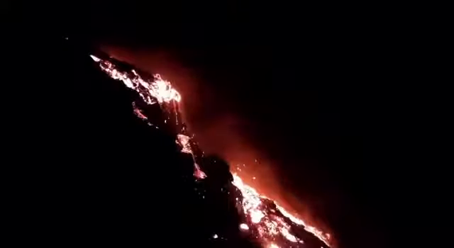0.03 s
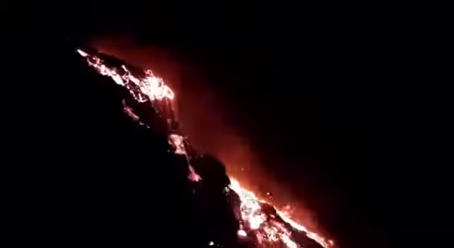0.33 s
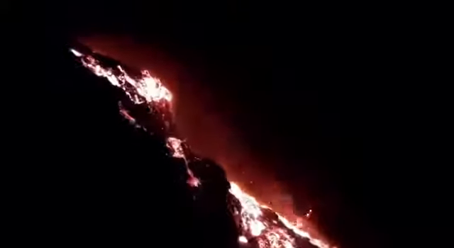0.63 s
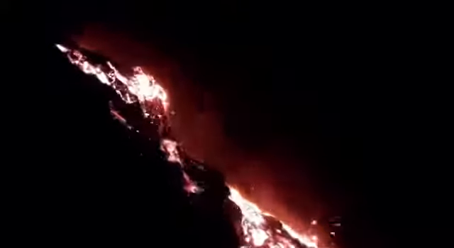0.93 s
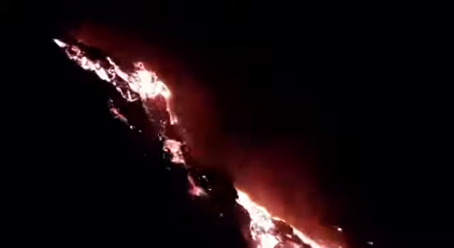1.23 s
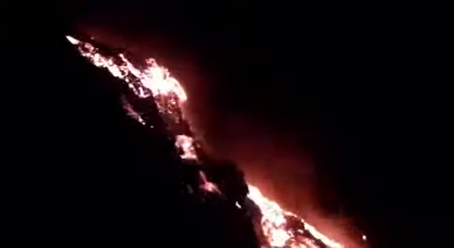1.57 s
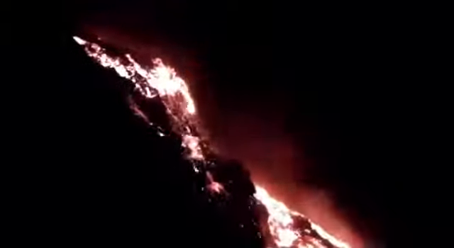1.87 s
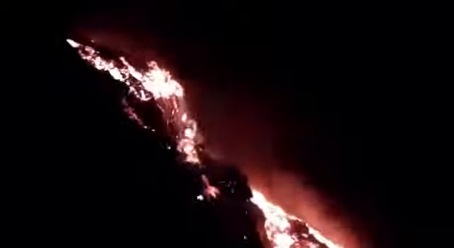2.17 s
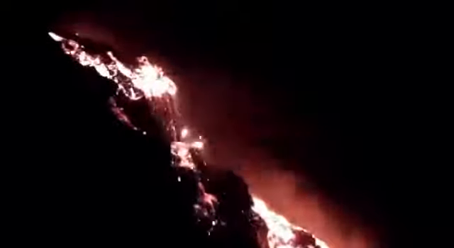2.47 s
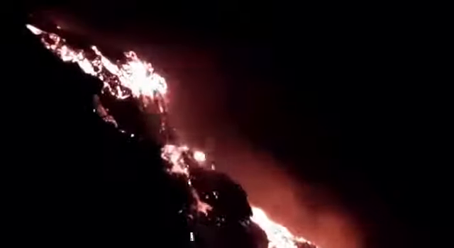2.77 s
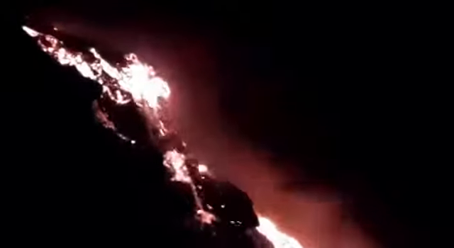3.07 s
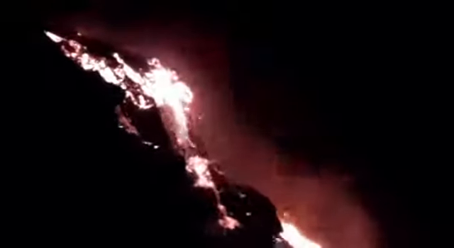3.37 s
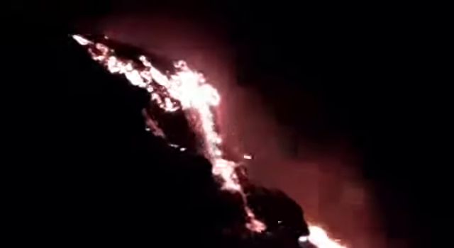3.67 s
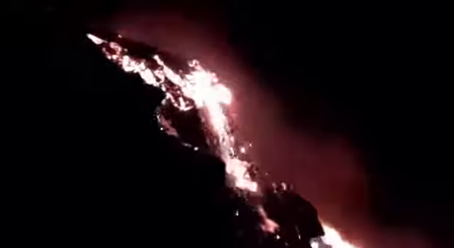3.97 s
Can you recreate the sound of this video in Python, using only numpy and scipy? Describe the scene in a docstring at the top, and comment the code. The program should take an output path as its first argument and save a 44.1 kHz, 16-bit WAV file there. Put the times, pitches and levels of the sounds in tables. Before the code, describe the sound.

A lava flow slides down a slope some way off with a steady rush, small crackles and the knocks and snaps of tumbling stones. Wind gusts rumble and pop on the microphone throughout, and two dry ticks sound close by.

```python
"""A lava flow at night, heard from some distance in gusty wind.
Loose clinker slides down the slope in a steady rush, full of small crackles, and larger fragments
knock, crack and snap as they tumble. Gusts rumble and flutter on the two microphone ports, each on
its own, and single eddies pop against them. Two dry ticks sound close by, over a faint electronic whine."""
import sys
import numpy as np
from scipy import signal
from scipy.fft import rfft, irfft
from scipy.io import wavfile
from scipy.ndimage import uniform_filter1d

SR = 44100
rng = np.random.default_rng(int(sys.argv[2]) if len(sys.argv) > 2 else 0)


def transcribe(signal):
    """Save signal, clipped to [-1, 1], as a 16-bit WAV file at the path in sys.argv[1]."""
    frames = np.atleast_2d(signal).T
    limited = np.clip(frames, -1, 1)
    pcm = np.round(limited * 32767).astype(np.int16)
    wavfile.write(sys.argv[1], SR, pcm)


N = 176400

# swell of the sliding clinker: time_s, body_db, hiss_db
SLIDE_LEVELS = [(0, -54, -51.5), (0.07, -53.5, -49), (0.19, -51, -51), (0.3, -54, -53), (0.52, -54, -51.5),
                (0.58, -60, -53.5), (0.72, -56, -50), (0.95, -52, -52.5), (1.13, -57.5, -53.5),
                (1.3, -53.5, -52.0), (1.44, -47.5, -50), (1.58, -56, -52.5), (1.72, -54, -50.5),
                (1.9, -55, -54), (2.05, -60, -53), (2.1, -53.5, -54), (2.16, -47, -49.5), (2.24, -54, -53),
                (2.45, -54.5, -55), (2.55, -53, -51.5), (2.9, -55.5, -53), (3.2, -52, -51.0),
                (3.36, -59, -56), (3.46, -58.5, -52.5), (3.58, -52, -51.5), (3.82, -49.5, -51),
                (4, -57, -53)]
# colour of its body: freq_hz, gain_db
BODY_COLOUR = [(40, -5.5), (120, -2.5), (400, 2), (800, -1), (1400, -1), (1900, -1.5), (2300, -13),
               (2650, -27.5), (3500, -50), (6000, -34.5)]
# colour of its hiss: freq_hz, gain_db
HISS_COLOUR = [(1200, -11.5), (2200, -3.5), (2650, -5), (3050, -3), (3800, 0), (4800, -1.5), (6300, -6),
               (7100, -11), (7900, -22.5), (9500, -28.5)]
# how alike the rush is left and right: freq_hz, correlation
RUSH_CORRELATION = [(100, 0.34), (1100, 0.41), (1550, -0.0026), (1900, 0.21), (2600, -0.13), (3100, 0.38),
                    (3900, -0.15), (4600, -0.024), (6500, -0.16), (8400, 0.35)]
# tone shaping of the small crackles: freq_hz, gain_db
CRACKLE_EQ = [(300, 6.5), (900, -4.5), (2000, 8), (2650, -2.5), (3500, -6.5), (5500, -9), (7000, -7),
              (8500, -18)]
# tumbling fragments: start_s, knock_db, crack_db, snap_db, crack_hz, snap_hz, ring_s
TUMBLES = [(0.1911, -64, -40.5, -46, 1900, 4360, 0.0024), (0.4224, -59, -39, -71, 1510, 4370, 0.0029),
           (.431, -47, -49.5, -70, 1730, 4370, 0.0039), (0.4587, -68, -41.5, -68, 1810, 3850, .0022),
           (.502, -46.5, -45.5, -48.5, 1570, 3790, 0.012), (0.6348, -63, -45, -56, 1200, 4360, 0.0032),
           (0.6522, -62, -54, -44.5, 2000, 3850, .003), (.683, -66, -57, -48, 2280, 3200, 0.0026),
           (.711, -61, -50, -51, 1770, 3830, .003), (0.7899, -66, -44, -41.5, 2100, 4220, 0.0016),
           (0.9926, -37.5, -41.5, -43, 1270, 3860, 0.0032), (1.006, -50, -47, -49, 1300, 3450, 0.0023),
           (1.2047, -64, -44.5, -37.5, 1710, 3400, 0.0033), (1.216, -43, -47, -53, 1620, 3920, 0.0023),
           (1.312, -60, -46.5, -50, 1450, 3700, .003), (1.4096, -36.5, -44.5, -48, 1790, 3600, 0.0034),
           (1.4458, -65, -55, -45.5, 1290, 3690, 0.0076), (1.6508, -41, -46.5, -46, 1650, 4050, 0.0015),
           (1.8214, -53, -49, -79, 1360, 3640, 0.0039), (1.921, -55, -52, -43.5, 2200, 3250, 0.0039),
           (2.1366, -34.5, -52, -45.5, 1140, 3800, 0.0024), (2.273, -44, -51.5, -52, 1660, 5600, 0.0085),
           (2.6183, -58, -45, -43, 1870, 3220, 0.0023), (2.7149, -75, -69, -43, 1250, 4800, 0.0012),
           (2.7395, -44.5, -49.5, -50, 1600, 4300, 0.0026), (3.071, -60, -56, -46, 1590, 3500, 0.0015),
           (3.1042, -38.5, -50, -56, 1000, 3570, 0.0023), (3.158, -45, -59, -60, 1400, 3630, .003),
           (3.2011, -50, -52, -42, 1280, 3300, 0.0012), (3.258, -44, -50, -72, 1480, 5000, 0.0024),
           (3.493, -60, -48, -53, 1600, 3880, 0.0057), (3.5641, -64, -50, -40.5, 1170, 4900, .0032),
           (3.5726, -66, -46, -43.5, 1600, 3970, 0.0024), (3.6332, -42.5, -48.5, -67, 1680, 3940, 0.0017),
           (3.698, -55, -47.5, -46.5, 1350, 5660, 0.0026)]
# one colour each for knock, crack and snap: freq_hz, gain_db
STONE_COLOURS = [
    [(150, -24), (450, 2), (800, -2.5), (1100, 0), (1600, -16), (4000, -71)],
    [(400, -42), (900, -1.5), (1250, -2), (1850, 5), (2300, 1.5), (2700, -18), (5000, -44)],
    [(1500, -39), (2600, -2.5), (3200, 7), (3900, 4), (5000, -2.5), (6800, -7.5), (8000, -22.5),
     (9500, -24)],
]
# wind strength at the microphone: time_s, level_db
GUST_LEVELS = [(0, -51.5), (.08, -45.5), (.2, -42), (.29, -43.5), (.46, -49.5), (.6, -51), (.68, -36),
               (.8, -48), (.91, -51.5), (.98, -41.5), (1.09, -40.5), (1.16, -39), (1.33, -40.5),
               (1.43, -30), (1.55, -46.5), (1.62, -46.5), (1.7, -39.5), (1.8, -37), (1.93, -42),
               (2.03, -57.5), (2.11, -47.5), (2.25, -65), (2.38, -51), (2.48, -37.5), (2.51, -32.5),
               (2.545, -34.5), (2.6, -37.5), (2.68, -60.5), (2.8, -47.5), (2.87, -40), (2.97, -48.5),
               (3.05, -38.5), (3.24, -46.5), (3.38, -50), (3.5, -42), (3.62, -55.5), (3.7, -58),
               (3.73, -33.5), (3.8, -38.5), (3.9, -39.5), (4, -50.5)]
# short buffets riding on the gusts: centre_s, level_db, left_over_right_db
WIND_BUFFETS = [(0.041, -49.5, -21.5), (0.195, -31.5, -1), (0.226, -36, 2), (0.302, -45.5, -15),
                (0.357, -36.5, -2), (0.413, -42.5, -5), (0.493, -42.5, 1.5), (0.661, -43.5, -21),
                (0.725, -43.5, -21.5), (0.753, -37, -3), (0.811, -44, -17.5), (0.974, -39, 1),
                (1.015, -36, -2), (1.223, -37.5, -5), (1.249, -35, -1.5), (1.374, -47, 2), (1.528, -37, -8),
                (1.574, -36.5, -0.5), (1.69, -39, -7), (1.817, -30, 3.5), (1.944, -40.5, -2),
                (2.512, -40.5, -17), (2.554, -37, -11), (3.029, -33, -6), (3.079, -37, -8),
                (3.12, -36, -9.5), (3.161, -43, -25), (3.226, -32, -3), (3.25, -36.5, -10.5),
                (3.486, -37.5, -4), (3.518, -38.5, -3.5), (3.562, -38.5, -5), (3.66, -46.5, -21),
                (3.809, -29.5, -6), (3.852, -31, 5.5)]
# wind colour in a lull: freq_hz, gain_db
LULL_COLOUR = [(15, -12), (35, -24.5), (62, -3.5), (115, 2.5), (200, -4), (350, -6.5), (500, -12.5),
               (800, -37), (1500, -36), (4000, -71)]
# wind colour in a strong gust: freq_hz, gain_db
BLAST_COLOUR = [(15, -24), (35, -15.5), (62, -12.5), (120, -0.5), (200, -1), (380, -2.5), (520, -10),
                (800, -20.5), (1500, -29.5), (4000, -85)]
# eddies popping on the ports: centre_s, peak_db, pitch_hz, left_over_right_db
EDDY_POPS = [(.2303, -25, 410, 11), (.3595, -26, 290, -11), (.7275, -28, 190, -3), (.9809, -29, 250, 11),
             (1.0194, -27, 350, 13), (1.379, -24, 320, 5), (1.4219, -25, 370, 10), (1.4619, -25, 330, 5),
             (1.4802, -23, 380, -13), (1.5305, -26, 320, -20), (1.7729, -24.5, 500, -13),
             (1.7925, -25, 310, 5), (1.819, -24, 400, 8), (1.8252, -24, 410, 20), (2.5127, -11.5, 410, -17),
             (2.5237, -20, 350, 20), (2.5432, -24, 130, -2), (2.5535, -26, 320, -6), (3.0212, -24, 290, 5),
             (3.2139, -25, 380, -20), (3.7833, -21, 370, -20), (3.7897, -25, 560, -20),
             (3.8032, -18, 400, -20), (3.808, -19, 330, 20), (3.8514, -21.5, 350, -16)]
# dry ticks close by: centre_s, level_db, pitch_hz
CLOSE_TICKS = [(.654, -32, 3750), (2.229, -27, 3880)]


def amp(db):
    """Decibels to gain."""
    return 10 ** (np.asarray(db) / 20)


def unit(x):
    """Scales to an rms of one."""
    return x / np.sqrt(np.mean(x ** 2) + 1e-20)


def at_hz(points, hz):
    """Reads a spectrum on a log-frequency axis."""
    freq_hz, value = np.transpose(points)
    return np.interp(np.log(hz + 1), np.log(freq_hz + 1), value)


def curve(table, column=1):
    """One column of a control table, at every sample."""
    rows = np.array(table)
    return np.interp(np.arange(N) / SR, rows[:, 0], rows[:, column])


def add(mix, start_s, sound):
    """Drops a stereo sound into the mix."""
    part = mix[:, max(round(start_s * SR), 0):][:, :sound.shape[1]]
    part += sound[:, :part.shape[1]]


def coloured(x, colour):
    """Equalises x with a colour, at an rms of one."""
    size = x.shape[-1]
    gain = amp(at_hz(colour, np.fft.rfftfreq(size, 1 / SR)))
    return unit(irfft(rfft(x) * gain, size))


def wander(corner_hz):
    """Random drift for each channel, rolling off above the corner."""
    hz = np.fft.rfftfreq(N, 1 / SR)
    return unit(irfft(rfft(rng.standard_normal((2, N))) / (1 + (hz / corner_hz) ** 2) * (hz > 2), N))


def steadied(x, size):
    """Evens out the level over a window of samples."""
    power = uniform_filter1d(uniform_filter1d((x ** 2).mean(0), size), size)
    return x / np.sqrt(abs(power) + 1e-12)


def patchy_noise(colour, patch_db, size=256):
    """Wide stereo noise whose spectrum flickers in short patches."""
    hz = np.fft.rfftfreq(size, 1 / SR)
    draws = rng.standard_normal((N * 4 // size + 8, len(hz), 5)).T
    left, unrelated = draws[0] + 1j * draws[1], draws[2] + 1j * draws[3]
    patches = unit(uniform_filter1d(uniform_filter1d(draws[4], size=6, axis=0), size=9, axis=1))
    correlation = at_hz(RUSH_CORRELATION, hz)[:, None]
    right = correlation * left + np.sqrt(1 - correlation ** 2) * unrelated
    spectra = np.array([left, right]) * amp(patch_db * patches)
    _, noise = signal.istft(spectra, nperseg=size, noverlap=size * 3 // 4)
    return coloured(noise[:, :N], colour)


def clinker_rush(body_trim_db=0.5, hiss_trim_db=1):
    """Countless distant fragments merge into a bed of body and hiss."""
    body = patchy_noise(BODY_COLOUR, patch_db=4) * amp(curve(SLIDE_LEVELS, column=1) + body_trim_db)
    hiss = patchy_noise(HISS_COLOUR, patch_db=2.5) * amp(curve(SLIDE_LEVELS, column=2) + hiss_trim_db)
    return body + hiss


def clinker_crackles(per_s=340, pitches=32, spread_db=3.5, ring_cycles=2.6, trim_db=-9):
    """Small pieces tick at random, each size with its own short ring, swelling with the rush's body."""
    out, t = np.zeros((2, N)), np.arange(1024) / SR
    for hz in np.geomspace(733, 6100, pitches):
        strengths = amp(spread_db * np.minimum(rng.exponential(1, N), 3.5))
        hits = strengths * (rng.random(N) < per_s / pitches / SR)
        age = hz * t / ring_cycles
        phase = rng.normal(0, 1.0, (2, 1))  # a phase for each side gives width
        ring = unit((1 - np.exp(-4 * age)) * np.exp(-age) * np.sin(2 * np.pi * hz * t + phase))
        out += signal.oaconvolve(hits[None], ring, axes=1)[:, :N]
    return coloured(out, CRACKLE_EQ) * amp(curve(SLIDE_LEVELS, column=1) + trim_db)


def tumbling_fragments(attack_s=.0009, scatter_db=-12, scatter_s=.013, centre_share=.8, tone_share=.35):
    """Each stone gives a dull knock and a ringing crack and snap, with a brief scatter off the slope."""
    size = 4096
    trims_db, ring_scales = (2.5, 4, 4), (.7, 1, .75)  # knock, crack, snap
    out, t = np.zeros((2, N)), np.arange(size) / SR
    attack, tail_s = np.minimum(t / attack_s, 1), np.maximum(t - attack_s, 0)
    scatter_envelope = attack * amp(scatter_db) * np.exp(-tail_s / scatter_s)
    for start_s, knock_db, crack_db, snap_db, crack_hz, snap_hz, ring_s in TUMBLES:
        layers = (knock_db, None), (crack_db, crack_hz), (snap_db, snap_hz)
        for (db, hz), colour, trim_db, ring_scale in zip(layers, STONE_COLOURS, trims_db, ring_scales):
            centre = np.sqrt(centre_share) * rng.standard_normal(size)
            sides = np.sqrt(1 - centre_share) * rng.standard_normal((2, size))
            blow = steadied(coloured(centre + sides, colour), size=160)
            if hz:
                tone = np.sin(2 * np.pi * (hz * t + rng.random()))
                blow = np.sqrt(1 - tone_share) * blow + np.sqrt(2 * tone_share) * tone
            envelope = attack * np.exp(-tail_s / (ring_s * ring_scale))
            scatter = scatter_envelope * coloured(rng.standard_normal((2, size)), colour)
            add(out, start_s, amp(db + trim_db) * (envelope * blow + scatter))
    return out


def wind(sway_db=2, flutter_db=4.5, buffet_s=0.012, lull_db=-45.5, blast_db=-27.5, trim_db=-1):
    """Turbulence flutters on each port, heaves with each buffet and brightens as it grows stronger."""
    t = np.arange(N) / SR
    power = amp(curve(GUST_LEVELS) + sway_db * wander(corner_hz=24.8)) ** 2
    for centre_s, db, pan_db in WIND_BUFFETS:
        heave = np.exp(-np.minimum(((t - centre_s) / buffet_s) ** 2, 20))
        power += amp([[db + pan_db / 2], [db - pan_db / 2]]) ** 2 * heave
    level_db = 10 * np.log10(power)
    force = np.clip((level_db - lull_db) / (blast_db - lull_db), 0, 1)
    air = rng.standard_normal((2, N)) * amp(flutter_db * wander(corner_hz=79.5))
    rumble = (1 - force) * coloured(air, LULL_COLOUR) + force * coloured(air, BLAST_COLOUR)
    rumble = np.vstack([steadied(port[None], size=1200) for port in rumble])
    return rumble * amp(level_db + trim_db)


def eddies():
    """A passing eddy pops: one push of pressure between two dips."""
    out, t = np.zeros((2, N)), np.arange(-400, 400) / SR
    for centre_s, db, hz, pan_db in EDDY_POPS:
        spread = (np.pi * hz * t) ** 2
        pop = (1 - 2 * spread) * np.exp(-spread)
        port_gains = amp(np.minimum([pan_db, -pan_db], 0))
        add(out, centre_s + t[0], amp(db) * np.outer(port_gains, pop))
    return out


def close_ticks(fade_s=.0016):
    """Dry, high ticks beside the microphone, in opposite phase on the two ports."""
    out, t = np.zeros((2, N)), np.arange(-500, 500) / SR
    for centre_s, db, hz in CLOSE_TICKS:
        tick = amp(db) * np.exp(-abs(t) / fade_s) * np.sin(2 * np.pi * hz * t)
        add(out, centre_s + t[0], np.outer([1, -1], tick))
    return out


def whine(pitch_hz=8785, level_db=-85):
    """A faint electronic tone in the right channel."""
    return np.outer([0, 1], amp(level_db) * np.sin(2 * np.pi * pitch_hz * np.arange(N) / SR))


def scene():
    """The flow and its fragments under the wind."""
    return clinker_rush() + clinker_crackles() + tumbling_fragments() + wind() + eddies() + close_ticks()


def record(dry):
    """The recorder adds its whine and cuts off the top end."""
    cutoff_hz = 9680
    lowpass = signal.firwin(511, cutoff_hz, window=("kaiser", 8), fs=SR)
    return signal.oaconvolve(dry + whine(), lowpass[None], "same")


dry = scene()
out = record(dry)
transcribe(out)
```